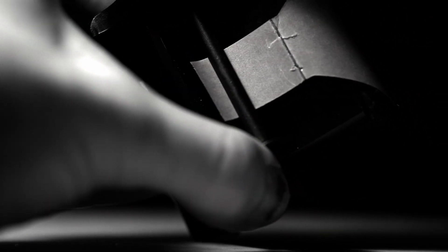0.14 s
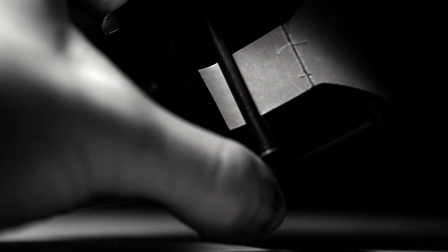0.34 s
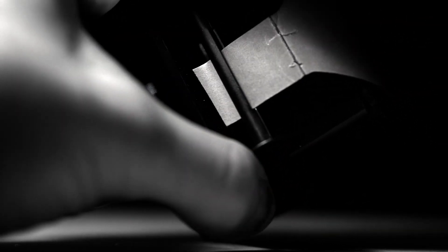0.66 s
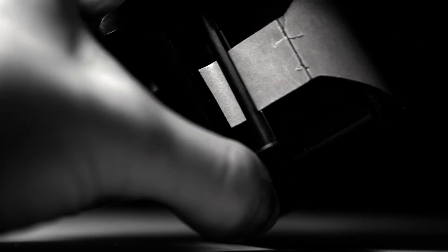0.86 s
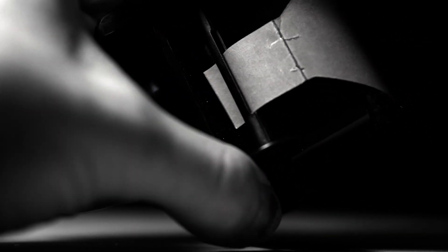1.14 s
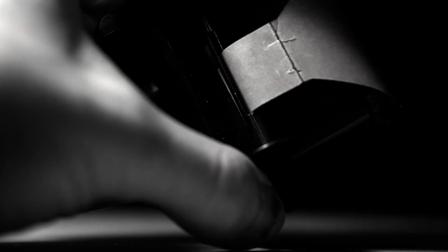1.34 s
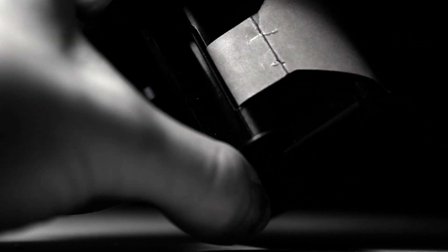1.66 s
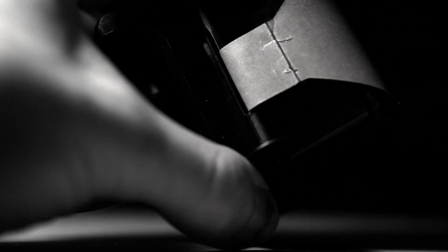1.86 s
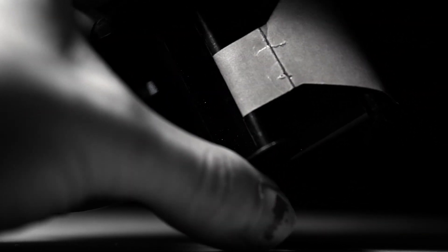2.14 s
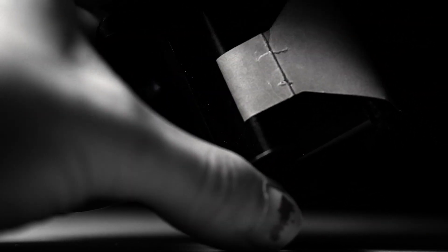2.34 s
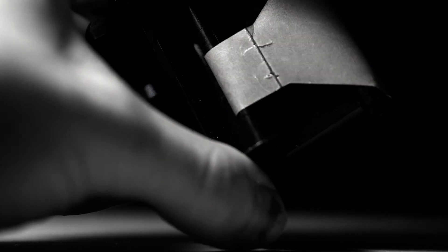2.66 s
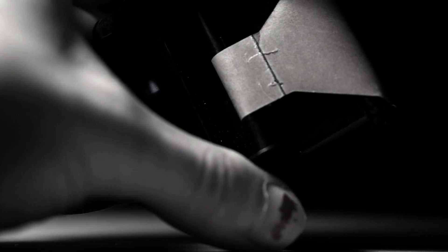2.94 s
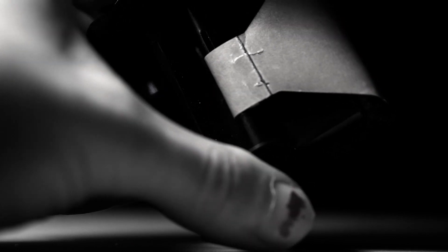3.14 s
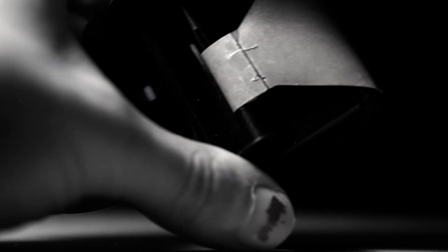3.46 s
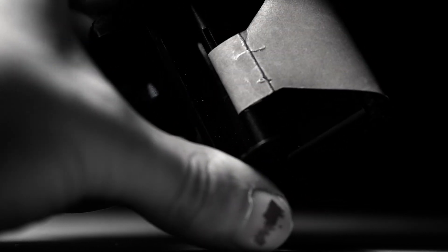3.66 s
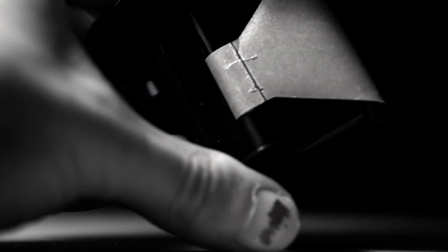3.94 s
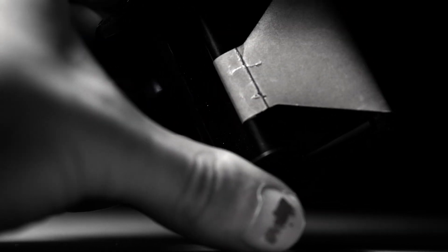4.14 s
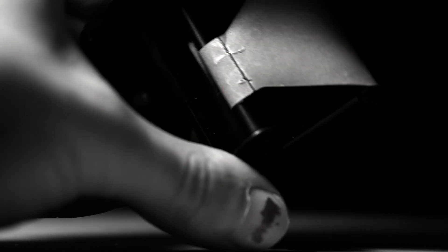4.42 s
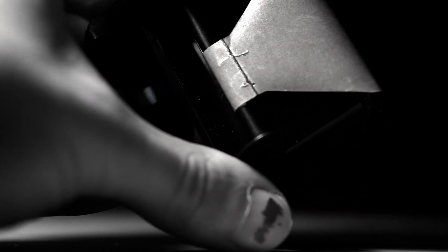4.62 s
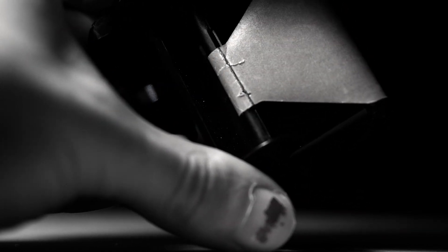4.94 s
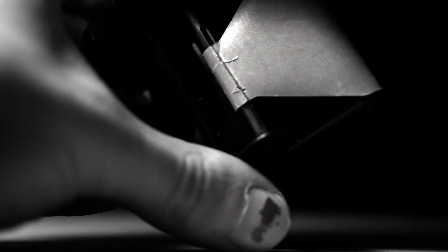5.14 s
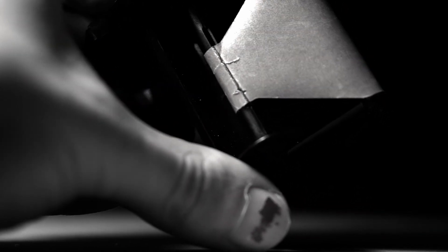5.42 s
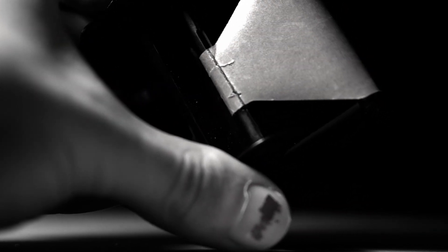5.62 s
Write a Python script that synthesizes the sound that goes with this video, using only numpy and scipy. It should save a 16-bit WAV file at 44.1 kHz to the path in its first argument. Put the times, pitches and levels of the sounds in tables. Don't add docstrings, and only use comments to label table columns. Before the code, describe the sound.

Extremely close to a small camera held over a table in a quiet small room. A knob is turned in short bursts: crisp spring clicks with a bright metal ring, some with a quick rebound. Between turns loose paper taps the hollow body. From just after three seconds the paper grips and creaks in dry snaps, mixed with tighter clicks. Faint rustle, finger thumps and low handling rumble lie beneath, over soft steady hiss.

```python
import sys
import numpy as np
from scipy import signal
from scipy.fft import rfft, irfft
from scipy.io import wavfile

SR = 44100
rng = np.random.default_rng(int(sys.argv[2]) if len(sys.argv) > 2 else 0)


def volts_from_decibels(level):
    exponent = np.asarray(level, float) / 20
    return 10 ** exponent


def generate_wav(sig):
    pcm = np.round(np.clip(np.atleast_2d(sig).T, -1, 1) * 32767).astype(np.int16)
    wavfile.write(sys.argv[1], SR, pcm)


N = 254879

# [start t/s, length/s, paper drag level/dB, grip level/dB]
KNOB_TURNS = [
    (0.26, 0.46, -67.5, -65.5),
    (1.078, 0.59, -66, -55),
    (2.056, 0.67, -60.5, -48.5),
    (3.018, 0.32, -56.5, -53.5),
    (3.872, .65, -60.5, -56),
    (4.802, 0.39, -59.5, -54.5),
    (5.45, .4, -73, -86),
]


def evened(x):
    return x / np.sqrt(np.mean(x ** 2) + 1e-20)


def read(points, hz):
    f, value = np.transpose(points)
    return np.interp(np.log(hz + 1), np.log(f + 1), value)


def coloured(points, lo_hz, hi_hz):
    hz = np.fft.rfftfreq(N, 1 / SR)
    gain = volts_from_decibels(read(points, hz)) * (hz > lo_hz) * (hz < hi_hz)
    return evened(irfft(rfft(rng.standard_normal(N)) * gain, N))


def background_hiss():
    # [f/Hz, density level/dB]
    hiss_spectrum = [(20, 16), (150, -9), (280, -2), (430, -10.5), (1000, -19.5), (2000, -36.5),
                     (2550, -51), (4500, -50), (5500, -28.5), (15900, -31)]
    return volts_from_decibels(-70 + 6.5) * coloured(hiss_spectrum, 8, 18000)


def blows():
    # [t/s, strength level/dB,
    # load on the body/dB, spring note f/Hz]
    pawl_drops = [(0.4179, -43.5, -12, 11400), (0.5811, -35, -9.5, 10150), (1.0746, -34.5, -9, 11300),
                  (1.1675, -39.5, -7.5, 10300), (1.264, -39, -11.5, 10600), (1.3266, -37, -16.5, 12700),
                  (1.3793, -38.5, -17.5, 11000), (1.5011, -34.5, -28, 10400), (1.5487, -36.5, -15, 10400),
                  (2.0441, -31.5, -42, 14500), (2.1239, -30.5, -36, 14900), (2.189, -33, -30, 14800),
                  (2.2523, -33.5, -24, 15200), (2.3332, -40, -14.5, 15300), (2.486, -41, 0, 8900),
                  (2.5165, -33, -7, 14700), (2.9848, -35, -7, 13040), (3.0695, -31.5, 6.5, 1270),
                  (3.1244, -34.5, -3, 6640), (3.1544, -49, -13, 7800), (3.2064, -35, -2.5, 9740),
                  (3.2591, -33.5, -7, 9000),
                  (3.425, -42, -3, 9550), (3.9211, -40, 0.5, 9100), (3.9713, -57.5, -2, 7900),
                   (4.0032, -37.5, -0.5, 9200), (4.0441, -38, 2.5, 9200), (4.1056, -37.5, 1.5, 9000),
                   (4.1383, -43, 5.5, 8500), (4.2709, -43.5, 4, 6540), (4.3488, -45, 3, 9800),
                   (4.5036, -54.5, 12, 6900), (4.7412, -48.5, 11.5, 6850), (4.7903, -46, 14, 1260),
                   (4.8379, -34.5, -1.5, 10800), (4.8584, -34.5, -0.5, 10130), (4.891, -37.5, -0.5, 10700),
                   (4.969, -43, 5.5, 10400), (5.017, -38.5, -1.5, 10400), (5.1503, -42.5, -5, 10400),
                   (5.1702, -41.5, -4.5, 10500), (5.3731, -70.5, 8, 8400)]
    # [t/s, strength level/dB, load on the body/dB]
    rebounds = [(0.4209, -41, -7.5), (1.172, -40, -10), (1.271, -45.5, -2), (1.3338, -44.5, -8),
                (1.3898, -49.5, -4), (1.5097, -54, 3), (1.5571, -51.5, -0.5), (2.0322, -65.5, 15),
                (2.0551, -49, 1.5), (2.1321, -55, 8), (2.1962, -50, -1), (2.2603, -57.5, 2),
                (2.3033, -73, 18), (2.3393, -60, 10), (2.3935, -55.5, 4), (2.4047, -70, 6),
                (2.6078, -56, 0.5), (4.9734, -37.5, -6.5), (5.0251, -40.5, -2.5), (3.086, -48, -6),
                (3.103, -51, -8), (3.365, -61, -10), (3.419, -58, -3), (4.321, -62, -6)]
    # [t/s,
    # strength level/dB, sharpness/dB, note f/Hz]
    taps = [(.0935, -64, -12, 850), (.3224, -53, -9, 1550), (.4013, -63, 0, 900), (2.321, -63, -11, 700),
            (.7463, -68, 8, 2550), (.7963, -66, -2, 2620), (.9451, -74.5, 8, 3250),
            (1.6764, -60.5, -15.5, 845), (1.6895, -60.5, -5, 830), (1.8072, -64.5, -1.5, 547),
            (2.0373, -59.5, -8, 570), (2.2457, -50, -20, 1260), (2.4377, -51.5, -6, 1370),
            (2.6922, -52.5, -13.5, 1230), (2.7627, -61, -0.5, 710), (2.7767, -48.5, -6.5, 1240),
            (2.9628, -46, -2, 1240), (2.9691, -42, -21, 1280)]
    # [t/s, strength level/dB, sharpness/dB]
    creaks = [(3.3264, -38.5, -0.5), (3.354, -38, -7), (3.4507, -44, -16), (3.4728, -49, -26),
              (3.5666, -53.5, -10), (3.581, -46.5, -12), (3.5872, -52, -3), (3.616, -48.5, -5.5),
              (3.6798, -54.5, -22), (3.7316, -48.5, -6), (3.7921, -39, -6.5), (3.8466, -40.5, -7.5),
              (3.8562, -42, -15), (3.8661, -56, -23), (3.8724, -41, -16), (3.879, -50, -16),
              (4.2388, -27.5, -5), (4.3666, -39.5, -24), (4.4014, -45.5, -2.5), (4.413, -52, -20),
              (4.4181, -34, -5.5), (4.4559, -40.5, -3.5), (4.479, -43.5, -2.5), (4.4905, -51, -6),
              (4.663, -56, -25)]
    # [t/s, strength level/dB, sharpness/dB]
    taut_creaks = [(4.9071, -37.5, -15), (5.09, -37, 0), (5.1089, -34, -8), (5.2166, -42.5, -1.5),
                   (5.395, -56, -10), (5.4211, -34.5, -4.5), (5.539, -31, -3), (5.6162, -33.5, -3.5),
                   (5.626, -38, -3), (5.636, -34.5, -6), (5.6406, -38, -21), (5.6533, -46, -7),
                   (5.6618, -51.5, 1), (5.6688, -40.5, -5), (5.6856, -59, -13), (5.707, -45.5, -12),
                   (5.7621, -31, -7.5)]
    # [t/s, strength level/dB]
    finger_shifts = [(0.317, -66), (0.431, -59), (2.195, -54), (2.262, -54), (2.33, -67), (.452, -55.5),
                     (.52, -61), (0.729, -58), (1.088, -55), (1.5, -59.5), (2.635, -51), (2.699, -63),
                     (3.921, -62), (4.009, -47.5), (.7963, -61.5), (0.9458, -60.5), (1.076, -48),
                     (1.683, -52.5), (2.0569, -49), (2.1337, -47), (2.6062, -47.5), (2.7747, -53.5),
                     (2.9837, -46), (3.5808, -52), (3.8665, -50.5), (3.8724, -56), (4.4929, -53.5),
                     (4.5028, -51)]
    rebound_hz, creak_hz = 10000, 875

    rows = []
    for s, db, load, hz in pawl_drops:
        rows.append((s, db + load, db + 3 + 0.5 * load, db, hz))
    for s, db, load in rebounds:
        rows.append((s, db + load, db + 5 + 0.5 * load, db, rebound_hz))
    for s, db, sharp, hz in taps + [row + (creak_hz,) for row in creaks + taut_creaks]:
        rows.append((s, db, db + sharp, db - 18.5 + 0.96 * sharp, hz))
    clicks = []
    for row in rows:
        thump_db = -56 + 0.77 * (row[2] + 40)
        thump_db = thump_db - 5.5 * (row[0] > taut_creaks[0][0])
        clicks.append(row + (thump_db,))
    return clicks + [(s, -99, -99, -99, creak_hz, db) for s, db in finger_shifts]


def ring(modes, size, scatter_db, detune):
    t, out = np.arange(size) / SR, 0
    for hz, t60, db in modes:
        a, b = rng.standard_normal((len(blows()), 2, 1)).transpose(1, 0, 2)
        decay = volts_from_decibels(db + scatter_db * a - 60 * t / t60)
        out = out + decay * np.sin(2 * np.pi * hz * (1 + detune * b) * t)
    return out


def note(lo_hz, hi_hz, t60, db, size):
    hz, t = np.transpose(blows())[4][:, None], np.arange(size) / SR
    in_range = (hz > lo_hz) * (hz <= hi_hz)
    return in_range * volts_from_decibels(db - 60 * t / t60) * np.sin(2 * np.pi * hz * t)


def chatter(rise_s, fall_s, spiky_db):
    s, knock_db, snap_db, fizz_db, hz, thump_db = np.transpose(blows())
    length = np.clip(1.5 + (fizz_db - snap_db) / 25, .3, 1)[:, None]
    t = (np.arange(600) / SR - .0025) / length
    shape = np.where(t < 0, np.exp(-.5 * (t / rise_s) ** 2), np.exp(-np.maximum(t, 0) / fall_s))
    a, b = rng.standard_normal((len(s), 2, 600)).transpose(1, 0, 2)
    return shape * a * volts_from_decibels(spiky_db * b)


def strike(drive, response, level_db, lo_hz, hi_hz, size=260):
    sound = signal.fftconvolve(drive, response, axes=1)
    band = signal.butter(3, [lo_hz, hi_hz], "bandpass", fs=SR, output="sos")
    sound = signal.sosfilt(band, sound)
    click_rms = np.sqrt(np.mean(sound[:, 20:size] ** 2, 1, keepdims=True))
    sound = sound * volts_from_decibels(level_db)[:, None] / click_rms
    out = np.zeros(N + sound.shape[1])
    for s, click in zip(np.transpose(blows())[0], sound):
        out[round(s * SR) - 120:][:len(click)] += click
    return out[:N]


def winding():
    # [f/Hz, t60/s, level/dB]
    slack_body = [(700, 0.015, -0.5), (990, 0.02, -7), (1270, .02, -1), (1628, 0.012, 1)]
    # [f/Hz, t60/s, level/dB]
    tight_body = [(800, 0.0042, -35), (855, 0.026, 14.5), (981, 0.018, 15), (1260, 0.0075, 20.5),
                  (1620, 0.14, -6)]
    # [f/Hz, t60/s, level/dB]
    shell_plates = [(2330, 0.0035, -28), (2678, 0.0051, 0), (3167, 0.0052, 3.5), (3490, 0.0057, 3),
                    (3910, 0.02, -11.5), (4170, 0.0035, -4), (4395, 0.0069, 6.5)]
    # [f/Hz, t60/s, level/dB]
    loose_plate = [(2695, 0.0094, 8.5)]
    # [f/Hz, t60/s, level/dB]
    latch_plate = [(4155, 0.0055, 7)]
    # [f/Hz, t60/s, level/dB]
    back_plate = [(2930, 0.0056, 9.5)]
    # [f/Hz, t60/s, level/dB]
    pawl_spring = [(6500, 0.002, 9), (8240, 0.013, -1), (9350, 0.0063, 1), (10400, 0.0036, 10.5),
                   (11430, 0.0048, -19.5), (12570, 0.0024, 6.5), (16730, 0.0028, -2)]
    # [f/Hz, t60/s, level/dB]
    dull_pawl = [(7130, 0.0044, 12)]
    # [f/Hz, t60/s, level/dB]
    case_modes = [(207, 0.0067, 7), (247.7, 0.11, 4), (293.4, 0.056, 13), (347, 0.11, -10.5),
                  (433, 0.016, -4)]
    # [f/Hz, t60/s, level/dB]
    table_mode = [(100, 0.29, -5.5)]
    thumb_s, loaded_s, paper_grips_s = 1.12, 2.45, 3.316

    s, knock_db, snap_db, fizz_db, hz, thump_db = np.transpose(blows())
    s, hz = s[:, None], hz[:, None]
    is_slack, is_metal = s < paper_grips_s, hz > 5000

    slack, tight = ring(slack_body, 2048, 3, .03), ring(tight_body, 2048, 2.5, .02)
    body = np.where(is_slack, slack, tight) + note(0, 1900, .025, 8, 2048)

    shell = ring(shell_plates, 1024, 2.5, .025) + note(1900, 5000, .01, 5, 1024)
    shell = shell + (s < thumb_s) * ring(loose_plate, 1024, -2.5, .013)
    shell = shell + is_metal * (s > loaded_s) * ring(latch_plate, 1024, 3, .058)
    shell = shell + ~is_metal * ring(back_plate, 1024, 1.5, .066)

    pawl = ring(pawl_spring, 512, 2.5, .04) + note(5000, SR, .006, 6, 512)
    pawl = pawl + (hz < 5000) * ring(dull_pawl, 512, 4, .04)
    pawl = pawl + note(14000, SR, .0024, 17.5, 512)

    case = ring(case_modes, 4096, 2.5, .04) + is_slack * ring(table_mode, 4096, 2.5, .02)

    knock = strike(chatter(.00011, .00042, 3.24), body, knock_db - .6, 488, 2440)
    snap = strike(chatter(.0006, .0016, 3.9), shell, snap_db - .4, 2010, 4300)
    fizz = strike(chatter(.0006, .0011, 4.5), pawl, fizz_db, 5900, 17500)
    thump = strike(chatter(.0012, .003, 1.5), case, thump_db - 1, 70, 450, size=620)
    return knock + snap + fizz, thump


def singing(hz):
    # [f/Hz, width/Hz, level over the tail/dB]
    thin_parts = [(705, 35, 10), (1650, 70, 3), (2654, 60, 7), (4000, 150, 0), (5900, 200, 7),
                  (12500, 250, 0)]
    return 1 + sum(volts_from_decibels(db) ** 2 * np.exp(-.5 * ((hz - f) / width) ** 2) for f, width, db in thin_parts)


def room(x):
    # [f/Hz, t60/s]
    room_decay = [(200, .3), (800, .38), (2500, .4), (5000, .4), (10000, .36), (16000, .28)]
    # [f/Hz, level/dB]
    room_colour = [(200, -8), (600, 1.5), (900, 8), (1600, 5.5), (2500, -0.5), (5000, 1.5), (10000, 0),
                   (16000, -8)]
    # [delay t/s, level/dB]
    near_echoes = [(.0045, -12.5), (0.0151, -15), (.021, -22.5)]

    hz, t, z = signal.stft(x, SR, nperseg=512, noverlap=448)
    width_hz = 25 + .02 * hz[:, None] + 5e-6 * hz[:, None] ** 2
    blur = np.exp(-.5 * ((hz[:, None] - hz) / width_hz) ** 2)
    power = blur / blur.sum(1, keepdims=True) @ abs(z) ** 2
    power = power * np.where(t < 2.95, singing(hz)[:, None], 1) * (hz < 15800)[:, None]
    keep = volts_from_decibels(-60 * (t[1] - t[0]) / read(room_decay, hz)) ** 2
    held = np.array([signal.lfilter([1 - k], [1, -k], row) for k, row in zip(keep, power)])
    a, b = rng.standard_normal((len(t), len(hz), 2)).T
    diffuse = (a + 1j * b) * np.sqrt(held) * volts_from_decibels(read(room_colour, hz))[:, None]
    tail = signal.istft(diffuse, SR, nperseg=512, noverlap=448)[1]
    late = np.pad(tail, (round(.011 * SR), 0))[:N]
    early = np.zeros(2000)
    for s, db in near_echoes:
        early[round(s * SR)] = volts_from_decibels(db)
    dulled = signal.lfilter([.25], [1, -.75], x)
    return volts_from_decibels(-10) * late + signal.oaconvolve(dulled, early)[:N]


def turning(levels_db, rest_db, fade):
    rise, sag, release = 234, 13.5, 59
    t, out = np.arange(N) / SR, rest_db
    for (s, length, *_), db in zip(KNOB_TURNS, levels_db):
        fall = sag * (t - s) + release * np.maximum(t - s - length, 0)
        out = np.maximum(out, db - np.where(t < s, rise * (s - t), fade * fall))
    return out


def rustle():
    # [f/Hz, density level/dB]
    rub_spectrum = [(300, -3), (800, -4), (1500, -1), (2100, -6), (2650, 2), (3300, -3), (4400, -6),
                    (5500, -18), (7500, -10), (11000, -15), (16000, -18)]
    # [t/s, drag level/dB, fade/dB per s]
    scuffs = [
        (.255, -65, 300),
        (0.298, -54, 700),
        (.312, -55.5, 400),
        (.76, -71, 200),
        (.94, -65, 500),
        (1.689, -63.5, 400),
        (1.811, -66, 406),
        (1.98, -67, 300),
        (5.36, -65, 294),
    ]
    t, drag_db = np.arange(N) / SR, turning(np.transpose(KNOB_TURNS)[2], -76, 0.75)
    for s, db, fade in scuffs:
        drag_db = np.maximum(drag_db, db - fade * abs(t - s))
    slips = volts_from_decibels(2.5 * np.minimum(rng.exponential(1, N), 4)) * (rng.random(N) < 500 / SR)
    grain = evened(1 + .7 * signal.oaconvolve(slips, np.exp(-np.arange(400) / SR / .0015))[:N])
    low = volts_from_decibels(drag_db - 3) * coloured(rub_spectrum, 300, 5200)
    bright_db = -67.5 + 1.46 * (drag_db + 60)
    bright = volts_from_decibels(bright_db - 3) * coloured(rub_spectrum, 5200, 15800)
    return grain * (low + bright)


def hands():
    rest_db = -90
    grip_db = turning(np.transpose(KNOB_TURNS)[3], rest_db, 1.5)
    lumps = volts_from_decibels(7.1 * np.tanh(coloured([(1.1, 3), (12, -6)], .6, 9.5)))
    rumble_db = -67.5 + 0.2511 * (grip_db - rest_db)
    rumble = volts_from_decibels(rumble_db - 3.5) * coloured([(12, 9.5), (28, -6), (60, -16), (90, -15.5)], 9.9, 76)
    hum = volts_from_decibels(grip_db - 8.5) * coloured([(60, 5.5), (97, 8), (125, 4.5), (250, -10)], 48, 440)
    return lumps * (rumble + hum)


def scene():
    hiss = background_hiss()
    clicks, thump = winding()
    near = clicks + room(clicks) + thump
    return (near + rustle() + hands() + hiss)[None]


def roll_off(x):
    return signal.sosfilt(signal.butter(12, 17000, fs=SR, output="sos"), x)


def record(dry):
    edge = signal.firwin(63, 16200, window=("kaiser", 5), fs=SR)
    return roll_off(signal.oaconvolve(dry, edge[None], "same"))


dry = scene()
out = record(dry)
generate_wav(out)
```